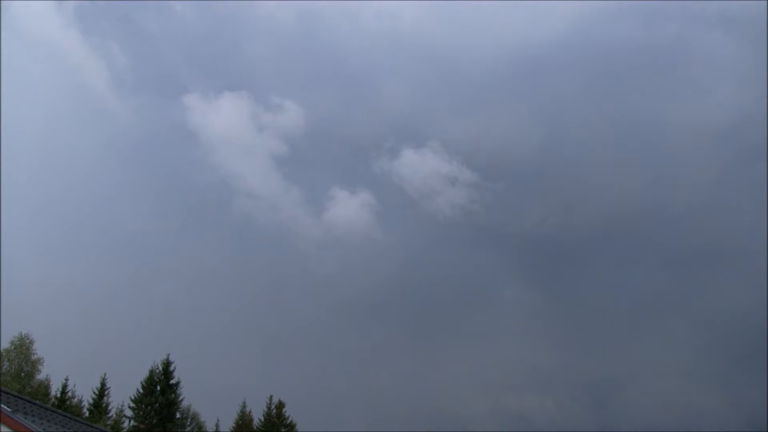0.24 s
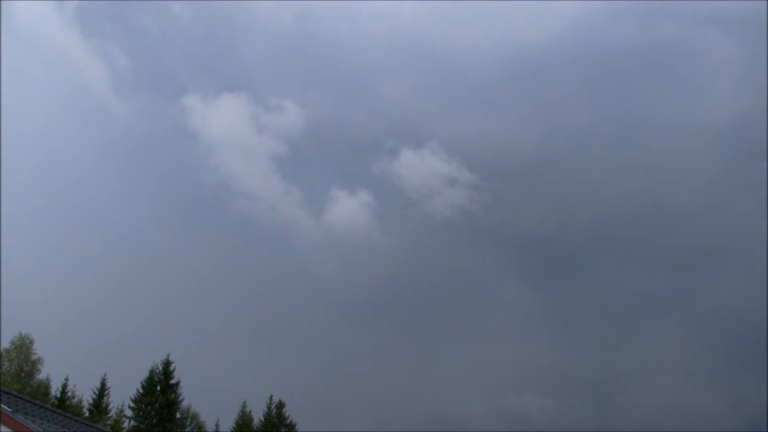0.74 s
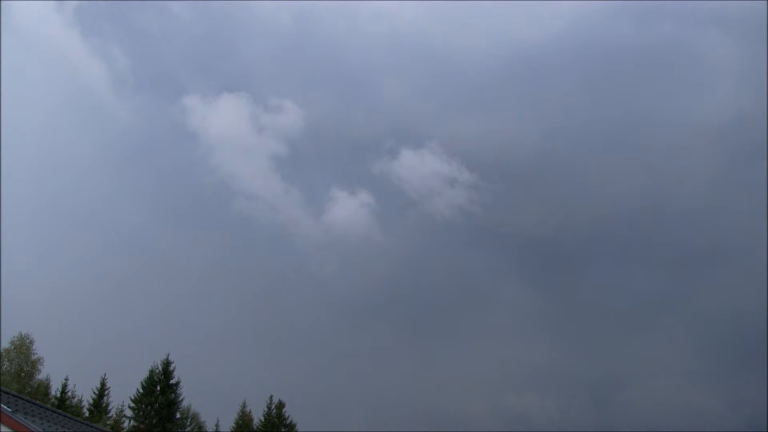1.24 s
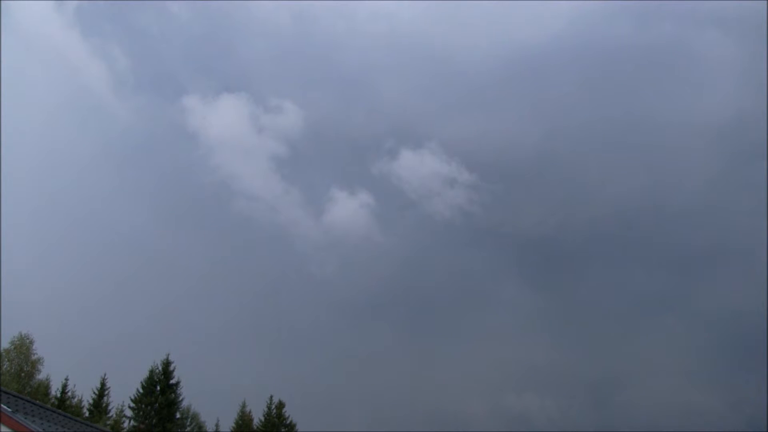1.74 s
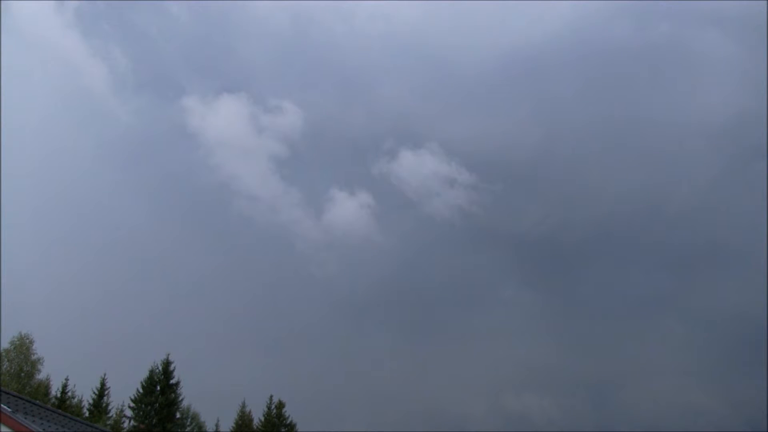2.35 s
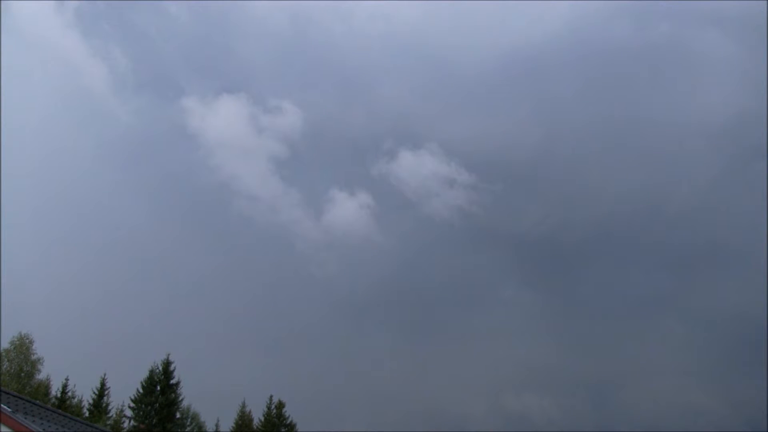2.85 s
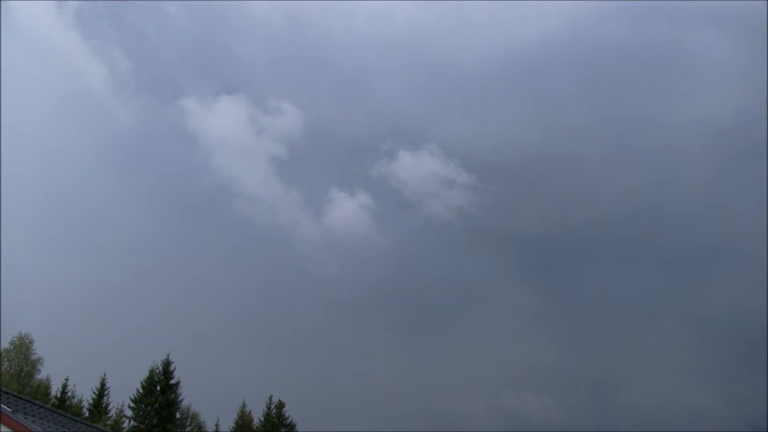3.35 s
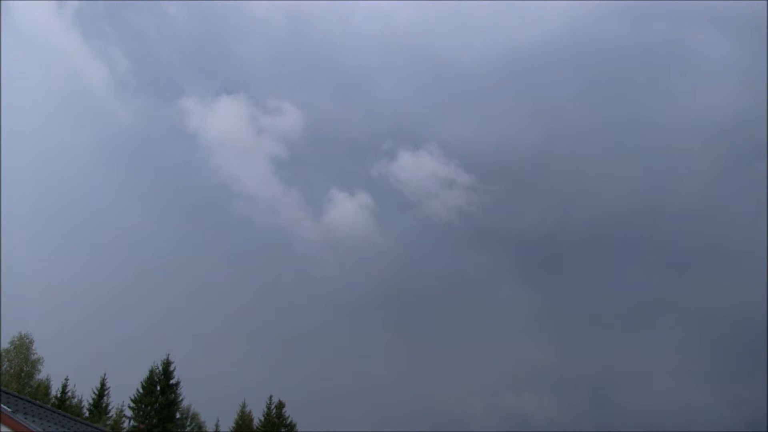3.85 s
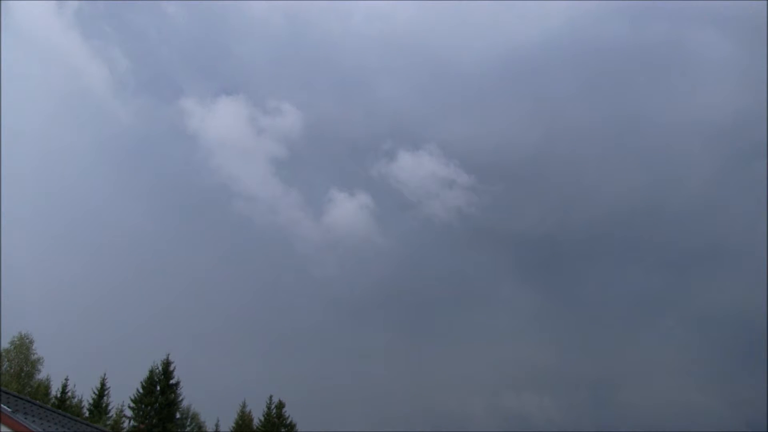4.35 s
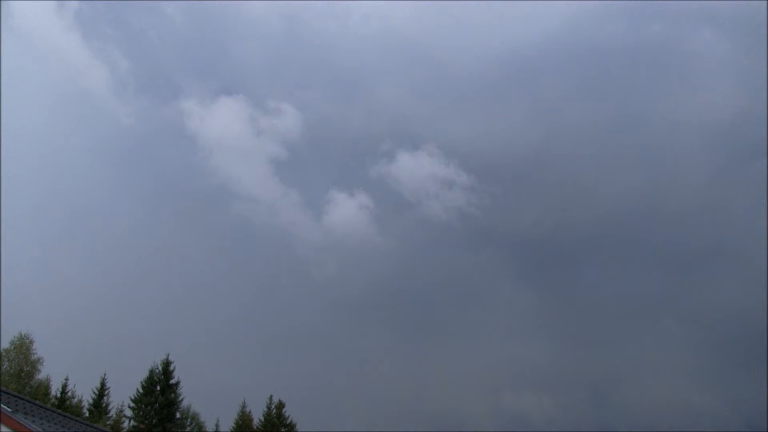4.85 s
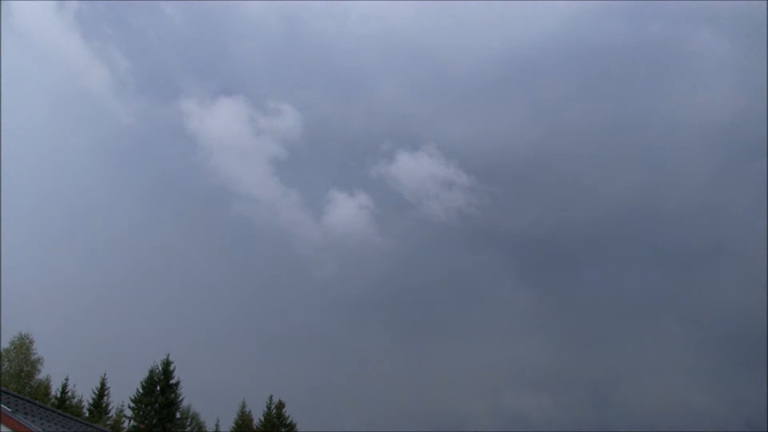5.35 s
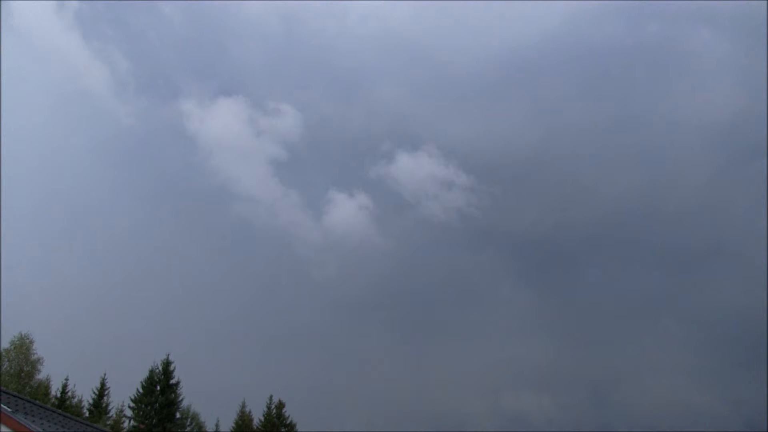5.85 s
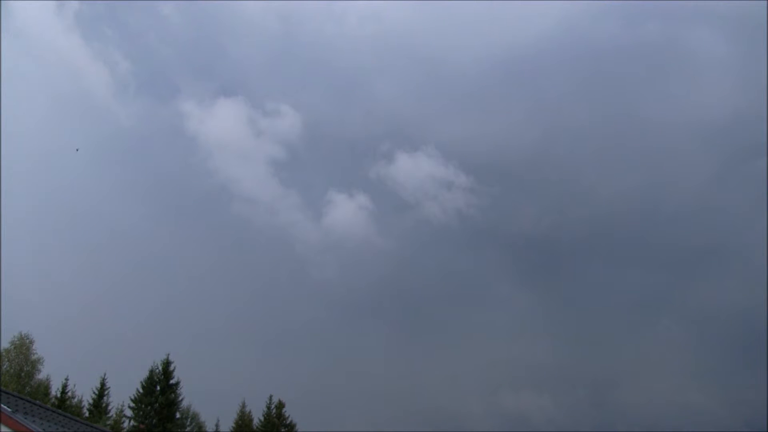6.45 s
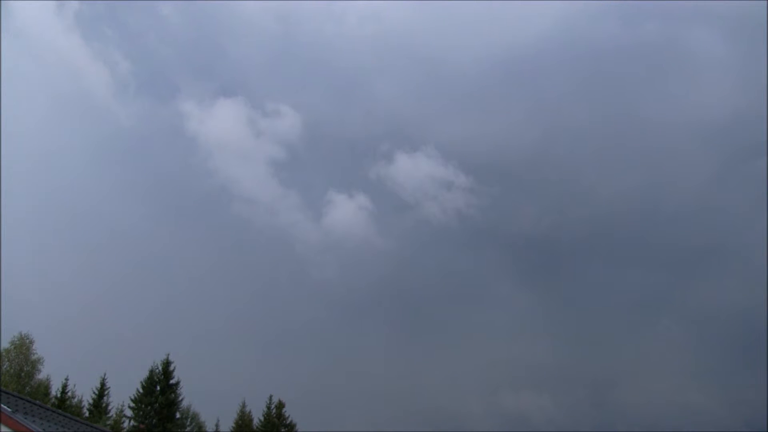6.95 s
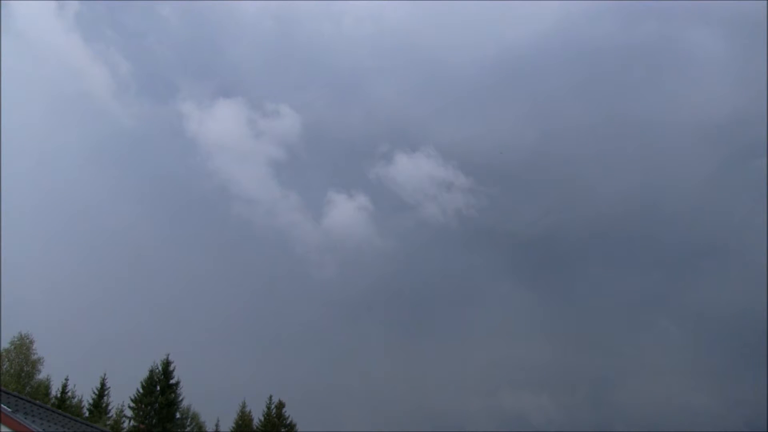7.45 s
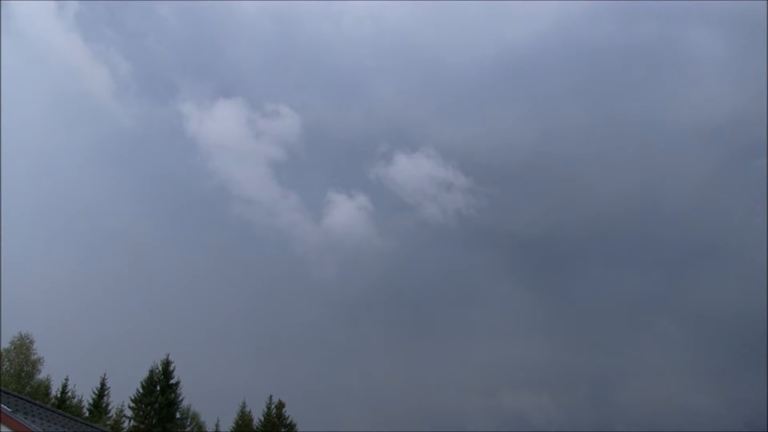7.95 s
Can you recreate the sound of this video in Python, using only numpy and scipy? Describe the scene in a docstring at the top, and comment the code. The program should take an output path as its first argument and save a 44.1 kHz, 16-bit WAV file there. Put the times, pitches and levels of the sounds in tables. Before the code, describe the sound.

Steady rain fills a wooded yard from the start: a wide, soft hiss with tiny ringing taps on leaves, its fine treble sizzle swelling in uneven waves, mostly on the left. At about 1.2 s a dull drop plops close by. Around 2.65 s thunder tears open abruptly, a dry, bright crackle with sharp cracks, then continues as ragged bursts over a low roll, strengthening near 3.8 s. A light tick at 4.25 s and a hard wet slap at 4.34 s strike beside the left of the microphone, amid more cracks. The thunder recedes slightly around 5 s, then surges at 5.5 s and peaks between 6.1 and 7.2 s in dense, heavy booms and knocks, pushing the rain down. From 7.3 s the blows become duller, hollower and more distant, easing into a low rumble by 8 s.

```python
"""Steady rain over a wooded yard: filtered noise that swells in the treble, with small ringing taps on leaves.
A dull drop plops close by; then nearby lightning tears open with a crackle, and a tick and a sharp slap follow.
The thunder swells and deepens into booms: bends of the channel send bursts of shock waves, side-on stretches
send single knocks, and weaker shocks roll between; far ones are dulled, and trees and roofs scatter the sound.
A gain control ducks the rain under the heaviest thunder."""
import sys
import numpy as np
from scipy import signal
from scipy.fft import rfft, irfft
from scipy.io import wavfile
from scipy.ndimage import uniform_filter1d, minimum_filter1d

SR = 44100
rng = np.random.default_rng(int(sys.argv[2]) if len(sys.argv) > 2 else 0)


def transcribe(u):
    """Save the signal u as a 16-bit wav file named by the first command-line argument.

    u: samples, shape (n,) or (channels, n), limited to [-1, 1]; the rate is SR.
    q: integer samples, one column per channel.
    """
    v = np.clip(np.atleast_2d(u).T, -1, 1)
    q = np.round(v * 32767).astype(np.int16)
    wavfile.write(sys.argv[1], SR, q)


N = 362061
TIME = np.arange(N) / SR  # seconds

# colour of the thunder: pitch_hz, level_db (per Hz)
THUNDER_TONE = [(25, -37), (48, -40), (70, -28), (95, -23), (130, -9.5), (172, -6.5), (208, 1), (255, -3.5),
                (335, 3), (500, 1), (700, -2), (900, -6.5), (1500, -12.5), (2200, -23.5), (3200, -40),
                (5500, -70.5)]
# how much thunder arrives from the sides: pitch_hz, side_minus_mid_db
THUNDER_SIDES = [(30, -4), (65, -10.5), (140, -14.5), (280, -6), (550, -2), (1200, -1), (3000, -1.5)]

PORT_LAG = 5  # travel time between the two microphone ports, in samples
SWING_S = 7.0  # from this time on, thunder reaches the left port first


def undb(db):
    """Turn decibels into a gain."""
    return 10 ** (np.asarray(db) / 20)


def unit(x):
    """Scale a sound to an average (rms) strength of 1."""
    return x / np.sqrt(np.mean(x ** 2) + 1e-18)


def curves(table):
    """Draw each column of a table as a curve over time, one value per sample."""
    s, *columns = np.transpose(table)
    return [np.interp(TIME, s, column) for column in columns]


def bin_pitches(n):
    """The pitch in Hz of each bin of an n-point transform."""
    return np.arange(n // 2 + 1) * SR / n


def spectrum_db(points, n):
    """Draw a tone colour through a few points, one level per bin of an n-point transform."""
    hz, db = np.transpose(points)
    return np.interp(np.log(bin_pitches(n) + 1), np.log(hz), db)


def colour(x, db):
    """Filter with the given gain per bin, never ahead of the sound, so that attacks stay sharp."""
    n = len(x)
    cepstrum = irfft(np.log(undb(db)), n)
    # folding the second half onto the first makes the filter minimum-phase
    cepstrum[1:n // 2] *= 2
    cepstrum[n // 2 + 1:] = 0
    return irfft(rfft(x) * np.exp(rfft(cepstrum)), n)


def below(x, hz, order=4):
    """Keep the part of a sound under a frequency, without delaying it."""
    low_pass = signal.butter(order, min(hz, .45 * SR), fs=SR, output="sos")
    return signal.sosfiltfilt(low_pass, x)


def walk(rate):
    """Smooth random drift with a spread near 1, taking a new value `rate` times a second."""
    k = int(SR / rate)
    steps = np.repeat(rng.standard_normal(N // k + 1), k)
    return 1.23 * uniform_filter1d(steps, k)[:N]


def impacts(n, rate, spread_db):
    """Randomly timed impulses, `rate` a second on average: many small ones, a few large."""
    chance, size, sign = rng.random((n, 3)).T
    strength = undb(spread_db * np.minimum(-np.log(1 - size), 4))
    return (chance < rate / SR) * np.sign(sign - .5) * strength


def rain():
    """A wash of distant drops is noise plus random impulses; its finest spray swells more on the left."""
    # colour of the rain: pitch_hz, level_db (per Hz)
    rain_tone = [(25, -26), (70, -16.5), (120, -6.5), (200, 2.5), (330, 2.5), (660, 1), (1100, -0.5),
                 (1700, -1), (3700, -5.5), (4550, -5.5), (5400, -8), (9000, -10), (11700, -11),
                 (15500, -18.5)]
    # how wide the rain is: pitch_hz, side_minus_mid_db
    rain_sides = [(60, 1.5), (110, -7), (200, -6), (380, 4.5), (700, 9), (1290, 6), (2380, 3.5), (4400, 3),
                  (8120, -0.5), (15000, -1.5)]
    # moments when the sizzle swells: middle_s, half_length_s, swell_db (before each side's share below)
    swell_list = [(0.948, 0.068, 5.5), (1.33, 0.39, 7), (2.166, 0.26, 8.5), (2.848, 0.045, 4.5),
                  (3.232, 0.19, 7), (3.692, 0.28, 6), (4.104, 0.046, 6.5), (4.604, 0.013, 8),
                  (4.834, 0.032, 6.5), (5.834, 0.32, 6), (6.352, 0.19, 2)]
    swell_db = sum(db * np.exp(-((TIME - s) / length) ** 2) for s, length, db in swell_list)
    # a small share of each swell lifts the whole hiss too
    level_db = -54.5 + 0.18 * swell_db
    sizzle_db = -4 + swell_db

    def drop_noise():
        nearer = undb(-11.5) * unit(impacts(N, 900, 3.3))
        return unit(rng.standard_normal(N) + nearer) * undb(0.81 * walk(21))

    tone_db = spectrum_db(rain_tone, N)
    mid = colour(drop_noise(), tone_db)
    side = colour(drop_noise(), tone_db + spectrum_db(rain_sides, N))
    # the middle treble of the front sound sets the level
    wash = np.array([mid + side, mid - side]) / np.std(below(mid, 7520) - below(mid, 4740))
    hiss = below(wash, 8500)
    # both sides rest about 1.8 dB under the wash's own treble; the left follows the swells far more
    sizzle_gain = undb(np.array([1.07 * sizzle_db + 2.5, 0.32 * sizzle_db - .5]))
    sizzle = (wash - hiss) * sizzle_gain
    return (hiss + sizzle) * undb(level_db)


def patter(size=700):
    """Single drops tap the nearest leaves: short ringing tones, each with its own pitch, strength and place."""
    taps_per_s, softest_db = 70, -41.5
    low_hz, high_hz, ring_cycles = 920, 6000, 3.1
    out, t = np.zeros((2, N + size)), np.arange(size) / SR
    for when, pitch, strength, place in rng.random((int(taps_per_s * N / SR), 4)):
        hz = low_hz * (high_hz / low_hz) ** pitch
        ring = np.sin(2 * np.pi * hz * t) * np.exp(-hz * t / ring_cycles)
        tap = ring * undb(softest_db + 10 * strength ** 3)
        start = int(when * N)
        out[:, start:start + size] += np.sqrt([[1 - place], [place]]) * tap
    return out[:, :N]


def drops(size=2048):
    """Drops strike nearby or on the housing by the left port: clicks and brief noise through resonances."""
    # strokes of the drops: a dull plop nearby, a tick, then one sharp slap in three strokes:
    # start_s, peak_db (of each stroke alone, at the left port), brightness_db_per_decade
    stroke_list = [(1.221, -27, -26), (4.2465, -17, 20), (4.3363, -6, 4), (4.3374, -1, -4),
                   (4.3405, -9, 15)]
    # the housing's broad resonances, which colour every stroke: pitch_hz, level_db (per Hz)
    housing_tone = [(150, -50), (500, -28), (1600, -19), (2050, -4), (2350, 6), (2750, -5), (3300, -12),
                    (3950, -30), (4600, -12), (6200, -18), (7400, -39), (8800, -44), (9700, -25),
                    (11200, -19), (13400, -25), (15500, -46)]
    out, t = np.zeros(N), np.arange(size) / SR
    decades = np.log10(np.clip(bin_pitches(size), housing_tone[0][0], None))
    for s, db, bright_db in stroke_list:
        push = undb(-15) * rng.standard_normal(size) * np.exp(-t / .001)
        push[0] = 1
        stroke = colour(push, spectrum_db(housing_tone, size) + bright_db * decades)
        start = int(s * SR)
        out[start:start + size] += undb(db) * stroke / np.abs(stroke).max()
    # the right port hears it later and weaker
    return np.array([out, np.roll(out, PORT_LAG) * undb(-13)])


def pings():
    """Faint whistles and narrow bands of hiss: slow noise shifted up to a pitch, swelling and fading."""
    # narrow bands: middle_s, pitch_hz, width_hz, half_length_s, level_db (left 1.5 up, right 1.5 down)
    ping_list = [(1.6, 6000, 400, .03, -52), (3.108, 8500, 248, 0.032, -46), (3.4, 4500, 1100, 0.5, -50),
                 (4.092, 11500, 1570, .11, -48), (4.65, 8050, 250, 0.025, -45.5)]
    out = np.zeros((2, N))
    for s, hz, width_hz, length, db in ping_list:
        slow_noise = below(rng.standard_normal((2, N)), width_hz / 2, order=2)
        band = unit(slow_noise * np.sin(2 * np.pi * hz * TIME))
        out += undb(db) * np.exp(-((TIME - s) / length) ** 2) * band
    return out * undb(np.array([[1.5], [-1.5]]))


def shocks(n, rate, spread_db, size=700):
    """Impulses of very uneven size whose summed strength stays steady from moment to moment."""
    x = impacts(n, rate, spread_db)
    return x / np.sqrt(np.abs(uniform_filter1d(x ** 2, size=size)) + 1e-4)


def air(x, boom_db, crackle_db):
    """Long paths leave the boom; short ones keep the crackle and its tearing edge as well."""
    # how far each band follows the two levels: upper_edge_hz, boom_share, crackle_share (plain factors)
    air_bands = [(90, 0, 0.23), (149, 0.87, -0.57), (227, 1, -0.14), (530, 0.12, 0.16), (1055, 0, 0.41),
                 (1790, 0.071, 1.17), (2770, 0.072, 1.53), (9300, 0.82, 1.63)]
    out, lower = 0, 0
    for hz, boom_share, crackle_share in air_bands:
        upper = below(x, hz, order=3)
        out = out + (upper - lower) * undb(boom_share * boom_db + crackle_share * crackle_db)
        lower = upper
    return out


def ports(mid, side, lag=PORT_LAG):
    """Two microphone ports: the left one lags by a few samples and the right is a little louder."""
    left = np.roll(mid + side, lag) * undb(-.65)
    right = (mid - side) * undb(.65)
    return np.array([left, right])


def lag_at(s):
    """Samples by which the left port trails; negative once the thunder has swung to the left."""
    return PORT_LAG if s < SWING_S else -PORT_LAG


def roll():
    """Countless weaker shocks from the rest of the channel, arriving in clumps."""
    # the roll between the bursts: time_s, level_db (drifting around this), boom_db, crackle_db
    roll_points = [(2.63, -39, 14, 10), (2.68, -30, 8, 7), (2.93, -29, 12.5, 11), (3.09, -29.5, 6, 11.5),
                   (3.14, -26.5, 7.5, 8.5), (3.44, -27, 5, 12), (3.72, -25.5, 7, 10),
                   (4.02, -24.5, 2, 10.5), (4.3, -22.5, -1, 8.5), (4.46, -21, 4, 9.5),
                   (4.53, -24.5, 1, 9.5), (4.63, -22, -5, 7.5), (4.92, -22.5, -2, 7), (4.99, -27, -4, 8.5),
                   (5.1, -25, 2, 8), (5.21, -27, -3, 6.5), (5.36, -26.5, 3, 4.5), (5.49, -15.5, 0, 2.5),
                   (5.56, -13, -1, 2), (5.75, -13, -6, 1.5), (5.95, -11.5, -9, 3), (6.15, -7, -5, -3.5),
                   (6.21, -10, -5.5, 4), (6.33, -12, -6, 3.5), (6.62, -12.5, -8, 2), (6.92, -11, -16, 4),
                   (7.15, -7.5, -7, -3.5), (7.22, -14, 2, -0.5), (7.31, -16.5, 3, 0.5),
                   (7.47, -14, -4, -4.5), (7.74, -15.5, -2, -12), (7.85, -19, 4, -10),
                   (7.95, -16, 12, -6.5), (8.05, -16, 6, -0.5), (8.2, -24, -4, 1.5)]
    db, boom_db, crackle_db = curves(roll_points)
    direct_db = spectrum_db(THUNDER_TONE, N)
    scattered_db = direct_db + spectrum_db(THUNDER_SIDES, N)
    clumps = undb(1.5 * walk(70))
    mid = air(colour(shocks(N, 1700, 0.49) * clumps, direct_db), boom_db, crackle_db)
    side = air(colour(shocks(N, 3000, 4.1) * clumps, scattered_db), boom_db, crackle_db)
    # dividing by the running strength lets the level curve alone set the loudness
    strength = np.sqrt(uniform_filter1d(mid ** 2, size=1800) + 1e-12)
    arrived = np.clip((TIME - roll_points[0][0]) / 0.007, 0, 1)
    swung = np.clip((TIME - SWING_S) / .1, 0, 1)
    heard = (1 - swung) * ports(mid, side) + swung * ports(mid, side, -PORT_LAG)
    lumpy_db = db + 1.1 * walk(30)
    return heard * arrived * undb(lumpy_db) / strength


def claps(size=8192, count=400):
    """Each burst is a crowd of shocks, densest near its front; scattered copies come from the sides."""
    # the strongest bursts: start_s, level_db, length_s, boom_db, crackle_db, pitch_hz
    burst_list = [(2.685, -22, 0.027, -8, 16.5, 720), (2.709, -21, 0.025, 7, 11, 676),
                  (2.757, -23.5, 0.025, -8, 9.5, 650), (2.83, -27, 0.018, -2, 8, 477),
                  (2.997, -25, 0.025, 9, 9, 730), (3.215, -28, 0.029, 7, 20.5, 580),
                  (3.255, -24, 0.018, 1, 12, 715), (3.313, -25.5, 0.021, -5, 6, 650),
                  (3.339, -20.5, 0.047, 3, 14.5, 626), (3.379, -26, 0.043, 13, 11.5, 610),
                  (3.571, -21, 0.041, 6, 10.5, 506), (3.791, -12.5, 0.035, 3, 6, 430),
                  (3.831, -22, 0.051, -1, 8, 660), (3.944, -23.5, 0.047, -1, 14, 667),
                  (4.075, -20, 0.037, -5, 8, 630), (4.123, -16, 0.037, -14, 16, 850),
                  (4.175, -19.5, 0.041, 0, 10, 510), (4.274, -12.5, 0.018, -3, 7.5, 680),
                  (4.335, -9, 0.028, -8, 6, 640), (4.379, -16, 0.038, 3, 7, 390),
                  (4.441, -20.5, 0.026, -2, 18, 840), (4.566, -18.5, 0.029, -3, 6, 730),
                  (4.678, -16, 0.064, -4, 7, 360), (4.87, -21.5, 0.043, 0, 8.5, 470),
                  (5.019, -19, 0.058, -6, 1, 536), (5.095, -19, 0.041, 0, 7.5, 510),
                  (5.263, -28, 0.059, -7, 8.5, 600), (5.377, -21, 0.023, -12, 9.5, 737),
                  (5.431, -14.5, 0.023, -16, 3, 435), (5.513, -5.5, 0.028, -2, -1, 370),
                  (5.548, -4, 0.023, -2, -2.5, 389), (5.616, -15, 0.06, -7, -1, 356),
                  (5.779, -10, 0.055, 8, 3.5, 363), (5.839, -11.5, 0.078, 1.5, -4.5, 395),
                  (5.899, -13, 0.033, -14, 4, 395), (5.93, -12, 0.059, 5, 1.5, 484),
                  (5.984, -5, 0.033, 1, 0, 444), (6.058, -6, 0.028, -3, 0.5, 357),
                  (6.122, 4.5, 0.052, 3, 2, 530), (6.164, -1, 0.026, -10, -6.5, 368),
                  (6.231, -1, 0.046, 10, -0.5, 435), (6.281, -3, 0.048, -5, -1, 463),
                  (6.353, -4, 0.087, 7.5, 1, 485), (6.458, -1.5, 0.029, 2, -3, 650),
                  (6.501, -5.5, 0.054, -2, -2, 399), (6.668, -3.5, 0.041, -4, 1.5, 450),
                  (6.741, -5.5, 0.025, -3, -2.5, 390), (6.799, -13.5, 0.091, 11, -0.5, 353),
                  (6.876, -6.5, 0.029, 7, -2.5, 496), (6.95, -3, 0.052, -10, -3.5, 467),
                  (6.979, -1.5, 0.06, -1, 2, 438), (7.037, -1, 0.038, -5, -6.5, 342),
                  (7.077, -3.5, 0.04, 2, -8.5, 325), (7.122, -3.5, 0.056, 2.5, -3, 480),
                  (7.14, -0.5, 0.042, 5.5, -0.5, 380), (7.232, -10.5, 0.04, -7, -7, 430),
                  (7.351, -7.0, 0.063, 10, -10, 302), (7.393, -1, 0.012, 7, -6.5, 300),
                  (7.412, -0.5, 0.023, -5, -15, 321), (7.515, -10, 0.061, 8.5, -9, 422),
                  (7.559, -8.5, 0.023, -1, -8.5, 310), (7.624, -11.5, 0.027, 0, -15, 320),
                  (7.662, -5, 0.041, 4, -12, 530), (7.697, -5.5, 0.027, 7, -16.5, 307),
                  (7.772, -9.5, 0.043, 0, -11.5, 403), (7.874, -11, 0.045, 2, -16, 447),
                  (7.954, -13.5, 0.024, -5, -1, 331), (7.983, -15, 0.033, 18, -4.5, 308),
                  (8.081, -13, 0.026, -18, -0.5, 610)]
    rise_s = 0.002665
    pitch_db, pitch_octaves = 6.5, 0.13  # how far the pitch stands out, and over what half width
    out, t = np.zeros((2, N + size)), np.arange(size) / SR
    direct_db = spectrum_db(THUNDER_TONE, size)
    # bursts come a little more from the front than the roll does
    scattered_db = direct_db + spectrum_db(THUNDER_SIDES, size) - 1.5
    hz = bin_pitches(size)
    for s, db, length, boom_db, crackle_db, pitch_hz in burst_list:
        # near, bright bursts break into single cracks; dull, distant ones are a denser crowd
        rate = 900 * undb(-.3 * crackle_db)
        crowd = np.exp(-(t / length) ** 2) * (1 - np.exp(-t / rise_s))
        front = shocks(size, rate, 2.1) * crowd
        front[int(rise_s * SR)] = 5.0  # one leading shock
        scatter = shocks(size, 2500, 3.2) * crowd
        # a bounce off the ground or a wall, with its own delay in seconds, hollows the burst
        bounce_s = rng.uniform(.0025, .011)
        bounce_db = 20 * np.log10(np.abs(1 + .45 * np.exp(-2j * np.pi * hz * bounce_s)))
        # the shocks of one burst are about equally long, which gives it a rough pitch
        octaves_off = np.log2((hz + 1) / pitch_hz)
        own_db = bounce_db + pitch_db * np.exp(-(octaves_off / pitch_octaves) ** 2)
        # a short lead-in leaves room for the air filter, which also reaches back in time
        mid = air(np.roll(colour(front, direct_db + own_db), count), boom_db, crackle_db)
        side = air(np.roll(colour(scatter, scattered_db + own_db), count), boom_db, crackle_db)
        gain = undb(db) * np.sqrt(length * SR / np.sum(mid ** 2))
        start = int(s * SR) - count
        out[:, start:start + size] += gain * ports(mid, side, lag_at(s))
    return out[:, :N]


def knocks(size=4096, count=400):
    """A stretch of channel lying side-on arrives all at once: a sharp crack when near, a hollow thud when far."""
    # single heavy shocks: start_s, peak_db (before the ports and the pan), boom_db, crackle_db, pitch_hz
    knock_list = [(2.713, -7, -4, 14, 650), (2.761, -6.5, -6, 21, 1000), (2.774, -14, -6, 16, 800),
                  (2.846, -18, -2, 22, 910), (3.0, -18, 3, 5, 725), (3.257, -12, -7, 8, 710),
                  (3.339, -11.5, 4, 7, 700), (3.353, -13, 1, 13, 420), (3.587, -7, 6, 14, 420),
                  (3.8, -6, 6, 5, 404), (4.278, -2.5, -4, 0, 670), (5.024, -16, -2, 4, 573),
                  (5.036, -14, 1, 7, 556), (5.554, 1, 1, -11, 390), (5.788, -3, 0, 4, 376),
                  (5.944, -3, 3, 1, 480), (5.986, -5, 8, -2, 448), (6.059, 1, 7, -5, 350),
                  (6.127, -1, -3, 2, 516), (6.188, 5.5, 2, -7, 321), (6.366, 0, 3, 4, 477),
                  (6.672, 4.5, 2, -1.5, 358), (6.987, 6, 11, 1, 440), (7.012, 3, 11, 0.5, 223),
                  (7.082, 4, 7, -5, 231), (7.148, 5, 8, 4.5, 407), (7.36, -3, 4, -13, 300),
                  (7.413, 4, 1, -4, 339), (7.519, 2, 8, -10, 432), (7.572, -0.5, 4, -6, 300),
                  (7.667, 0.5, 7, -10, 239), (7.696, 2.5, 13, -8, 148.7), (7.787, 0.5, -2, -17, 421),
                  (7.881, -2.5, 8, -20, 400)]
    echo_db, echo_s = -26, 0.01  # scattered copies that trail each knock
    pan_db = 0.5  # extra left minus right
    out, t = np.zeros((2, N + size)), np.arange(size) / SR
    hz = bin_pitches(size)
    tone_db = spectrum_db(THUNDER_TONE, size)
    for s, db, boom_db, crackle_db, pitch_hz in knock_list:
        push = rng.standard_normal(size) * undb(echo_db) * np.exp(-t / echo_s)
        push[0] = 1
        # the duller and farther the knock, the more its pitch stands out
        octaves_off = np.log2((hz + 1) / pitch_hz)
        ring_db = (13 - 0.23 * crackle_db) / (1 + (octaves_off / .12) ** 2)
        wave = air(np.roll(colour(push, tone_db + ring_db), count), boom_db, crackle_db)
        start = int(s * SR) - count
        out[:, start:start + size] += undb(db) * ports(wave / np.abs(wave).max(), 0, lag_at(s))
    return out[:, :N] * undb(np.array([[pan_db], [-pan_db]]) / 2)


def gain_control(x, size=44):
    """Loud bursts push the gain down at once; the longer they last, the more of that cut lingers."""
    ceiling_db = -15.5  # the cut starts here
    detector_hz, detector_s = 421, 0.013  # it hardly hears the bass, and averages over this time
    quick_db_per_s = 73  # fast release after a short peak
    charge_s, release_s = 0.018, 1.57  # the slow part builds up and lets go
    mid = np.mean(x, axis=0)
    power = (mid - below(mid, detector_hz, order=1)) ** 2
    average = uniform_filter1d(power, int(detector_s * SR))[::size]
    level_db = 10 * np.log10(np.abs(average) + 1e-12)
    step_s, quick, slow, cut_db = size / SR, 0, 0, []
    for over_db in np.maximum(level_db - ceiling_db, 0).tolist():
        quick = max(over_db, quick - quick_db_per_s * step_s)
        slow += (max(over_db - slow, 0) / charge_s - slow / release_s) * step_s
        cut_db.append(max(quick, slow))
    return x * undb(-np.interp(TIME, TIME[::size], cut_db))


def scene():
    """Thunder over rain: all the layers added up."""
    return rain() + patter() + drops() + pings() + roll() + claps() + knocks()


def record(dry, size=300):
    """Gain control rides the thunder, a limiter rounds the peaks that remain, and the top is cut off."""
    held = gain_control(dry)
    room = np.minimum(1, .98 / (np.abs(held).max(axis=0) + 1e-9))
    gain = uniform_filter1d(minimum_filter1d(room, size=2 * size), size=size)
    gain = uniform_filter1d(gain, size=size)
    top_cut = signal.ellip(10, .2, 70, 15800, fs=SR, output="sos")  # steep low-pass at 15.8 kHz
    return signal.sosfilt(top_cut, held * gain)


dry = scene()
out = record(dry)
transcribe(out)
```